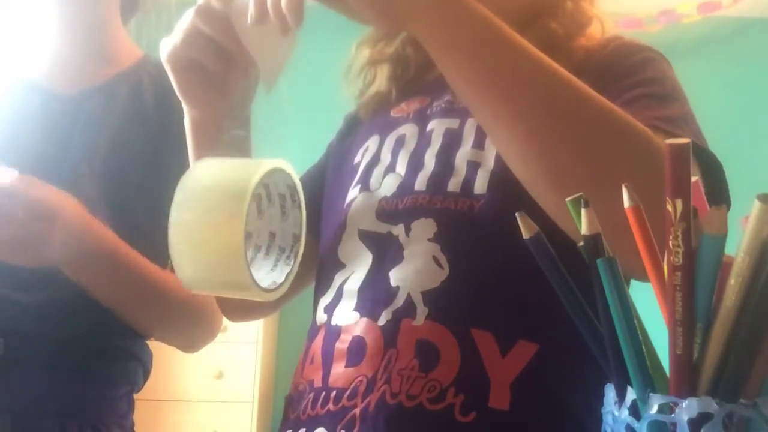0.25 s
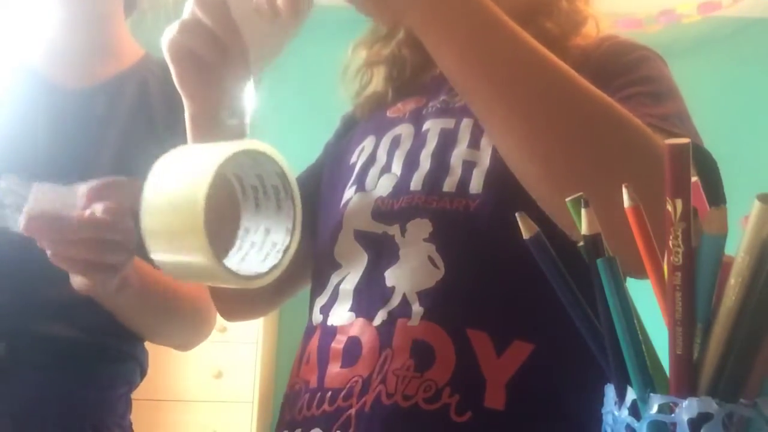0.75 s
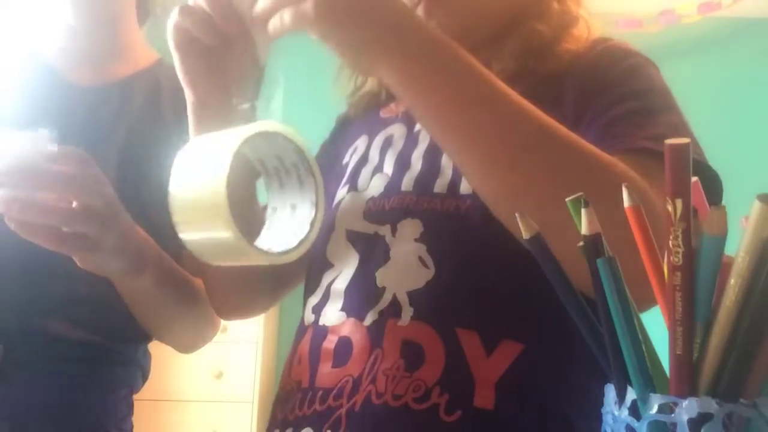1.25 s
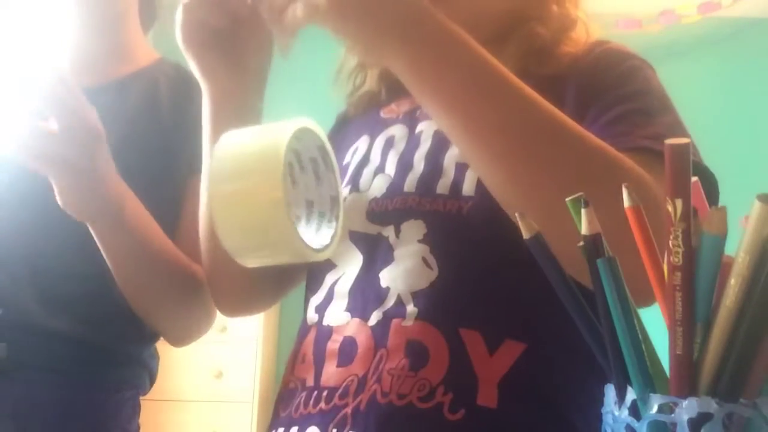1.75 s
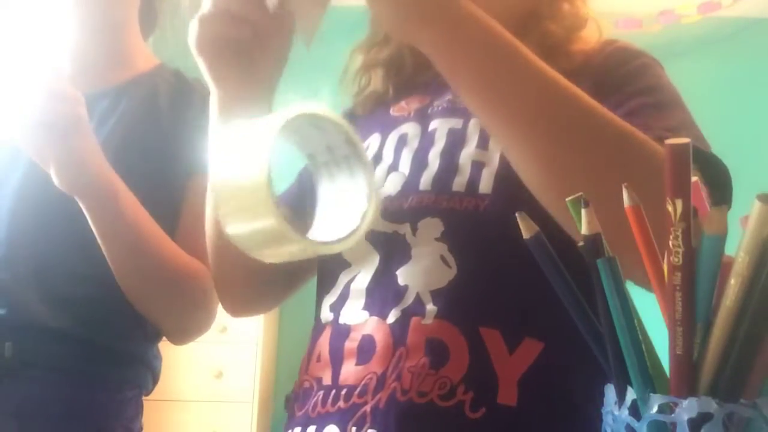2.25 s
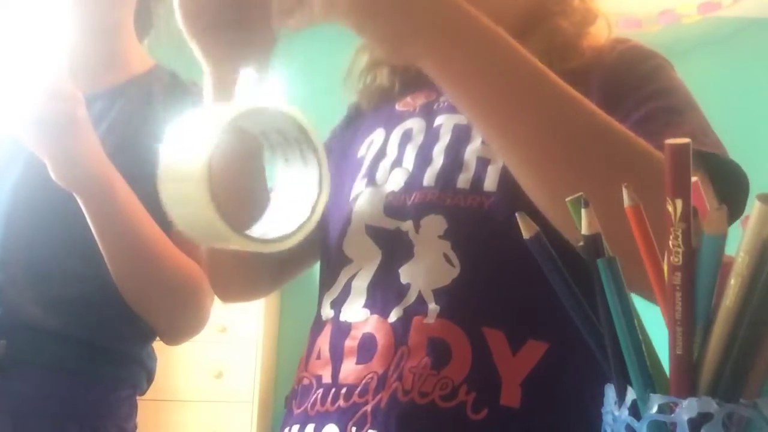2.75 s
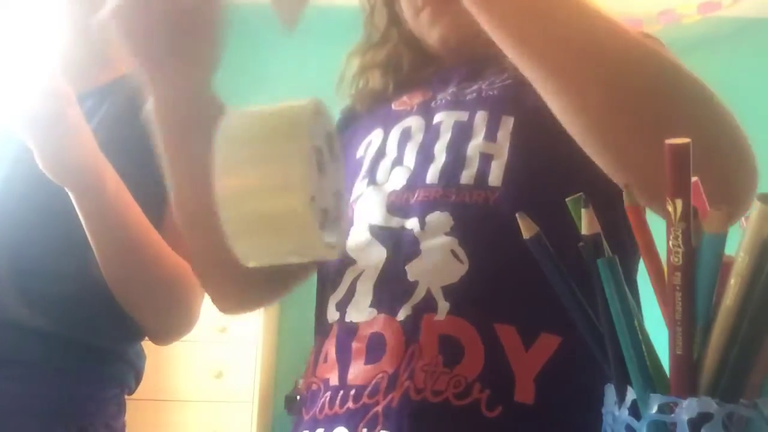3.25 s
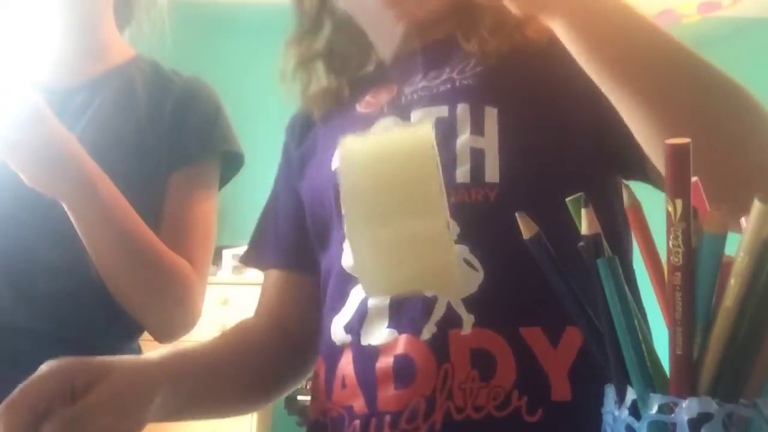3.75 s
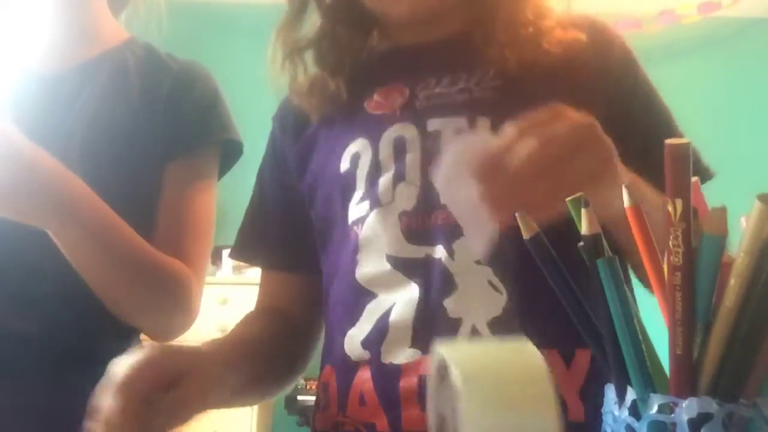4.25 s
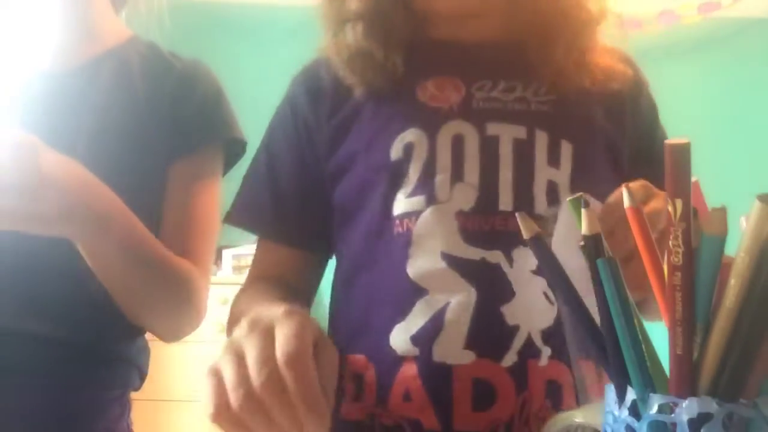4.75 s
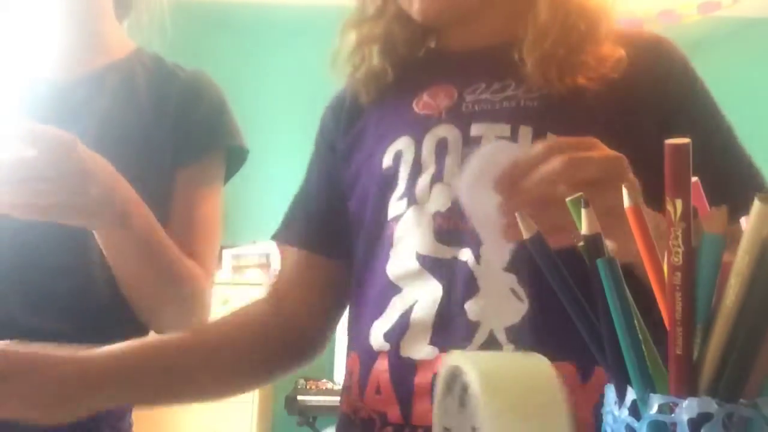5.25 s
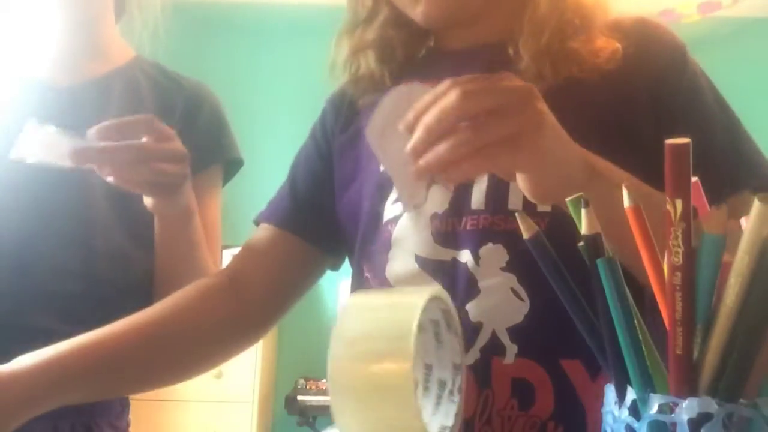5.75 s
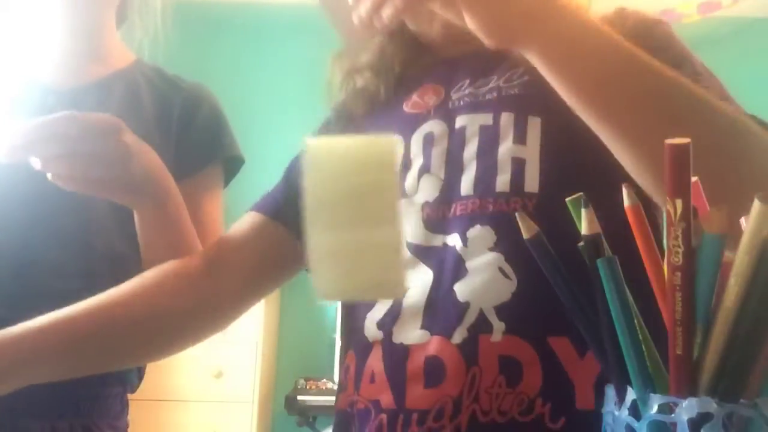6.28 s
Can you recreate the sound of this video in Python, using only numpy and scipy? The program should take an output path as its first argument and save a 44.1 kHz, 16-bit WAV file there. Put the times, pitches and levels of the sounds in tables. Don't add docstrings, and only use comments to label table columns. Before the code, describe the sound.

Loud knocks and a gritty drag on a wooden desk, then faint tape crackles and rustling, then another hard burst of knocking.

```python
import sys
import numpy as np
from scipy import signal
from scipy.fft import rfft, irfft
from scipy.io import wavfile
from scipy.ndimage import uniform_filter1d

SR = 44100
rng = np.random.default_rng(int(sys.argv[2]) if len(sys.argv) > 2 else 0)


def master_out(mix):
    frames = np.transpose(np.atleast_2d(mix))
    ceiling = np.clip(frames, -1, 1)
    pcm = np.round(ceiling * 32767).astype(np.int16)
    wavfile.write(sys.argv[1], SR, pcm)


def elevation(decibels):
    levels = np.asarray(decibels, float)
    return 10 ** (levels / 20)


N = 287532
RING = np.arange(SR // 4) / SR

# f/Hz, density/dB per Hz
HISS = [(40, -14), (86, -14), (119, -11.5), (134, -8), (155, -19), (351, -25.5), (388, -30.5), (417, -34.5),
        (684, -36), (774, -39), (1400, -41), (1620, -44), (7500, -53), (8900, -51), (13200, -52.5),
        (14600, -59)]
HISS_DB = -71.5
# f/Hz, width/Hz, level/dB
HUM = [(58.6, 6.5, -76.5), (115.8, 11, -63)]
ROOM_T60_S, ROOM_DB = 0.1, -13.5

# f/Hz, level/dB, t60/s
BOARD = [(89.6, -11.5, 0.11), (157, -2, 0.03), (195, 2.5, 0.32), (280, 4, 0.088), (320, -7, 0.17),
         (456, -8.5, 0.22)]
BOOM = [(54.6, -32, 0.13), (90.7, 4.5, 0.16), (147.1, 0, 0.14), (177.6, -5.5, 0.33)]
PANEL = [(237, -4.5, 0.029), (285.7, 1, 0.04), (331.5, -5, 0.19), (470.3, -9.5, 0.13)]
LID = [(562, -9, 0.17), (714.4, -1, 0.063), (892, -4.5, 0.033)]
CASING = [(1030, -8, .04), (1200, -4, 0.049), (1254, -1, 0.0092), (1542, -4.5, 0.011), (1810, -7.5, 0.018),
          (1630, 2, 0.0029)]
CRACK = [(2184, 0, 0.013), (2920, -12.5, 0.0047), (3380, 4, 0.0025), (3670, -6.5, 0.023), (4237, -2, 0.011),
         (4840, -1.5, 0.0034), (5890, 0.5, 0.0031), (6640, -17.5, 0.005)]
AIR = [(8670, 0, 0.0033), (11900, 4, 0.0008), (12400, -1, 0.00087), (13900, -17.5, 0.0068)]
STRIP = [(700.4, -4.5, 0.093), (1068, -3, 0.02), (1200, -5, 0.044), (1397, 3.5, 0.0074),
         (1690, -5.5, 0.021), (1890, -9, 0.01), (2230, -5, 0.0078)]
FILM = [(3000, -8.5, 0.0034), (4370, 1, 0.0025), (5000, -11.5, 0.0068), (5980, 3, 0.0059),
        (5650, -12, 0.0048)]
FLAP = [(1380, -0.5, 0.053), (1585, 0, 0.021), (1904, -5, .02), (2350, -8.5, 0.023), (2520, -19.5, 0.012)]
GRIT = [(1870, 7, 0.012), (2280, 3.5, .01), (2940, 0, 0.012), (3240, 1.5, 0.0089), (3860, -6, 0.0054),
        (4974, -11, 0.0046), (5500, -15, .006)]
PLATES = [(558, -1, 0.17), (700, 1.5, 0.13), (1230, -3, .1), (1800, -15, .07), (1980, -17.5, .06)]
PLATES_DB = -14.5

# t/s, strip peak/dB, air/dB, rattle/ms
TICKS = [(0.5107, -50, -110, 3.7), (0.6589, -60.5, -65, 13), (1.724, -56, -82, 4), (1.9844, -58, -77.5, 17),
         (2.2712, -49.5, -82, 1.7), (2.3436, -47.5, -57.5, 12), (2.4174, -53, -84, 28),
         (2.4994, -57.5, -74, 6.5), (2.5481, -63, -56.5, 7), (2.5955, -59, -50, 5.3), (2.653, -47, -74, 11),
         (2.7751, -51.5, -100, 17), (2.8823, -58, -59, 7.8), (3.025, -70, -90, 5.9),
         (3.2186, -62, -65, 7.4), (3.3064, -53, -73, 7), (3.5244, -57, -93, 3.1),
         (3.8914, -56.5, -55.5, 15.5), (3.9694, -71, -62, 20), (4.1036, -66, -66.5, 11),
         (4.2055, -58, -55, 8.6), (4.2184, -53, -41.5, 8.6), (4.3545, -52.5, -44, 6.6),
         (4.4298, -55.5, -83, 6.8), (4.6798, -57, -65.5, 26)]
# t/s, strip peak/dB, air/dB, rattle/ms
FLEXES = [(1.791, -71, -54.5, 16), (2.3247, -54, -76, 22), (2.4014, -59, -85, 24), (2.4744, -66, -73, 14),
          (3.0538, -69, -80, 21), (3.1518, -75, -79, 35), (3.225, -72, -66.5, 18), (3.404, -69.5, -67, 48),
          (3.451, -66.5, -69, 44), (3.9436, -72.5, -70, 22), (4.0044, -70, -77, 32)]
FILM_SHARE, TICK_FILM_DB, FLEX_FILM_DB = 0.49, -5, -1
# t/s, effort/dB, crispness/dB
RUSTLE = [
    [(0.45, -85, -16), (0.608, -68, -6), (0.73, -90, -24)],
    [(0.82, -70.5, 15.5), (1.32, -84, 4.5)],
    [(1.74, -63, -13), (2.1, -81, -14), (2.48, -72.5, -19.5), (2.62, -79, -16), (2.88, -67, -12.5),
     (3.1, -70.5, -6.5), (3.35, -63.5, -13.5), (3.7, -81.5, -12), (4.13, -83.5, 2.5), (4.44, -73.5, -10),
     (4.58, -65, -13), (5.08, -67.5, -17)],
]
RUSTLE_AIR_DB = -0.5
# t/s, peak/dB, rise/ms, rattle/ms
CRINKLES = [(0.755, -61, 1.7, 6), (0.822, -37, 2.3, 6.8), (4.607, -66, 3, 9), (4.655, -45.5, 3, 14),
            (4.678, -44.5, 2, 16), (4.698, -46, 1.5, 9.2), (4.72, -53, 4, 9.6), (4.75, -57.5, 6.9, 31),
            (4.825, -68, 3.1, 9.8), (4.98, -58.5, 2.9, 23), (5.32, -55, 4.1, 13), (5.40, -66, 2.5, 7.9),
            (5.425, -59, 4, 12), (5.563, -54, 3.6, 11), (5.595, -66, 4, 6)]
# t/s, peak/dB, rise/ms, rattle/ms
WISPS = [(1.158, -62, 1.4, 6), (1.19, -67, 4, 13), (1.58, -63, 2.5, 8.3), (1.8136, -62, 1.1, 6.5),
         (2.4007, -64, 2.2, 8), (2.6512, -71, 1, 3.8), (2.9335, -71, 1, 6), (3.07, -71.5, 8.7, 25),
         (3.12, -72, 8.5, 18), (3.2368, -66, 1.8, 15), (3.43, -73, 9.7, 30), (3.9777, -61.5, 1.12, 5.3),
         (4.0141, -66, 3, 18), (4.0964, -73.5, 2.1, 8.7), (4.1153, -65.5, 1.1, 7), (4.262, -69.5, 2, 6),
         (5.475, -64.5, 5.3, 13), (5.68, -59, .8, 7)]

# t/s, pressure/dB, bite/dB
DRAGS = [
    [(0.76, -47.5, -14), (0.83, -59, -1), (0.944, -44, -13), (1.03, -41.5, -7.5), (1.144, -37, -13),
     (1.284, -44.5, -19.5), (1.464, -38, -21), (1.56, -58, -7), (1.74, -63, -7.5)],
    [(5.1, -73, -4), (5.17, -53, -9), (5.3, -65.5, -4), (5.445, -58, -3), (5.49, -55, -6),
     (5.632, -47, -12)],
    [(5.665, -35, -20), (5.819, -48, -14), (5.941, -42.5, -19), (6.049, -48, -18), (6.22, -41, -31),
     (6.29, -40, -8.5), (6.36, -44.5, -15), (6.44, -59.5, -0.5), (6.52, -51, -14)],
]
DRAG_LID_DB, DRAG_CRACK_DB = -16, -13
# t/s, peak/dB, rise/ms, rattle/ms
SCRAPES = [(0.89, -55, 5, 8.8), (1.03, -52, 5.7, 16), (1.121, -59, 4, 10), (1.14, -45, 4.5, 11),
           (1.158, -40.5, 6, 25), (1.195, -52, 6, 14), (1.232, -52, 1.8, 5.4), (1.505, -47, 8.6, 12),
           (1.56, -55.5, 5, 8.8), (5.11, -47, 2.9, 20), (5.475, -42.5, 8, 16), (5.58, -65, 5, 10),
           (5.66, -44, 4.1, 9.6), (6.028, -59, 5, 18), (6.108, -49, 7, 13), (6.35, -63, 2.2, 5.4)]
# landing t/s, level/dB
GRAZES = [
    (5.089, -37),
    (5.46, -36),
    (5.644, -39),
    (5.881, -52),
    (6.197, -40),
    (6.424, -41),
]

# t/s, peak/dB, f/Hz, rattle/ms
CLIPS = [
    (0.8772, -32, 3435, 3),
    (1.0001, -25.5, 3840, 3),
    (1.1948, -46, 3000, 11),
    (5.0868, -34, 2970, 5.3),
    (5.641, -39, 3340, 9.2),
    (6.2462, -30.5, 3710, 2.8),
    (6.2851, -46, 3380, 3.6),
]
# t/s, peak/dB, f/Hz, rattle/ms
KEYS = [(0.8464, -30, 1200, 1.6), (1.0151, -16.5, 1115, 2.3), (1.065, -41.5, 1130, 12),
        (1.1709, -34.5, 1150, 7.8), (1.226, -35.5, 1090, 3.6), (1.5391, -48, 1590, 4.8),
        (2.7738, -48.5, 1360, 3.4), (5.3658, -51, 1290, 24), (5.4026, -44.5, 1340, 21),
        (5.8819, -48, 1200, 14), (6.1984, -27.5, 1600, 8.5)]
# t/s, peak/dB, f/Hz,
# rattle/ms
PINS = [(1.3275, -79, 8700, 3), (1.456, -49.5, 12400, 12), (1.46, -55, 9200, 8), (2.272, -59.5, 3430, 7.5),
        (2.343, -53.5, 4540, 12), (2.41, -62, 4630, 20), (3.155, -69.5, 4150, 61), (3.22, -67, 4140, 23),
        (5.3304, -63, 4800, 19), (6.1144, -63, 5850, 10), (6.4225, -30.5, 5270, 6.3),
        (6.4457, -53.5, 5060, 31)]
# t/s, peak/dB, f/Hz, rattle/ms
CHATTER = [(0.93, -36, 291, 19), (0.955, -42, 700, 14), (1.003, -20, 281, 2.8), (1.07, -41, 1230, 15),
           (1.1, -37.5, 543, 13), (1.185, -36, 1230, 15), (1.24, -44, 689, 18), (1.41, -46, 700, 29),
           (1.484, -30, 293, 6.7), (1.502, -23, 296, 9), (1.519, -44, 2330, 3.1), (1.96, -56.5, 294, 44),
           (4.535, -59.5, 280, 7.4), (4.665, -50, 263, 15), (4.712, -49, 204, 8.9), (5.222, -61, 707, 9),
           (5.46, -31, 562, 14), (5.887, -33, 562, 9.1), (6.255, -35, 352, 5.2), (6.425, -24, 327, 7)]
# t/s, peak/dB, f/Hz, t60/s
SOLID = [(0.778, -32, 284, .08), (0.789, -28.5, 280, 0.043), (0.847, -31, 274, 0.11),
         (0.879, -33, 154, .16), (0.885, -39, 102, .16), (0.889, -30.5, 266, 0.19),
         (1.01, -22.5, 148.3, .16), (1.35, -31, 238, 0.098), (1.39, -35.5, 88, 0.18),
         (1.535, -26, 288, 0.085), (1.55, -28, 151, 0.11), (5.09, -32.5, 339, 0.046),
         (5.105, -30, 97.6, 0.16), (5.458, -24, 728, 0.065), (5.459, -24, 336, 0.1),
         (5.465, -29, 120, 0.13), (5.646, -24, 322, 0.059), (5.649, -29, 840, 0.035),
         (5.655, -24.5, 89, 0.23), (5.758, -31.5, 129, 0.19), (5.769, -23.5, 262, 0.023),
         (6.197, -31, 339, 0.14), (6.202, -31.5, 144, 0.085), (6.221, -30.5, 126, 0.36),
         (6.253, -32.5, 349.5, 0.16), (6.43, -32, 96, 0.086), (5.462, -31.5, 560, 0.15),
         (5.884, -35, 340, 0.057), (5.887, -38, 562, 0.11), (6.425, -24.5, 310, 0.034),
         (1.483, -29.5, 286, .18),
         (1.013, -27, 715, 0.046), (1.539, -27.5, 985, 0.023), (1.539, -25.5, 1507, 0.018),
         (3.307, -64.5, 655, 0.055), (5.087, -42, 3135, 0.044), (5.456, -36, 2180, 0.037),
         (5.458, -35.5, 3110, .025), (5.643, -32, 6000, .015), (5.644, -41, 3260, .025),
         (5.712, -35.5, 1365, .04), (5.738, -32, 1400, 0.059), (5.737, -29, 2263, 0.026),
         (5.751, -27.5, 1577, 0.038), (6.202, -28, 2155, .025), (6.246, -35, 3310, 0.028)]
SOLID_RISE_S = 0.0016

# t/s, strength/dB, push/ms
TAPS = [(0.777, -32.5, 16), (0.92, -33.5, 23), (1.016, -28, 2.7), (1.17, -38, 8.4), (1.226, -34, 4),
        (1.332, -40, 6.7), (1.351, -38.5, 9.8), (1.416, -37, 11), (5.458, -27, 2.5), (5.799, -34, 5.5),
        (6.29, -38.5, 5.3)]
# t/s, strength/dB, push/ms
THUMPS = [(0.846, -32, 16), (0.88, -27.5, 7), (1.005, -31, 10), (1.39, -35, 3.4), (1.536, -33, 4),
          (2.343, -50, 3.5), (5.089, -30.5, 3.9), (5.489, -36, 2.8), (5.644, -31, 9.8), (5.714, -32, 22),
          (5.76, -31.5, 9.5), (6.201, -28, 5.1), (6.247, -30, 13), (6.426, -35, 3.5)]
# t/s, strength/dB, push/ms
THUDS = [
    (0.982, -41.5, 1.7),
    (1.057, -51, 15),
    (1.564, -41.5, 7.5),
    (5.111, -40.5, 7.4),
    (5.322, -55.5, 25),
    (5.885, -44.5, 12),
    (5.953, -50, 4.2),
    (6.113, -41.5, 1),
    (6.224, -41.5, 9.2),
    (6.347, -39, 14),
]
TAP_BOOM_DB, THUMP_BOOM_DB, THUD_BOOM_DB = -12, -1.5, 6

# t/s, crack peak/dB, lid/dB, casing/dB, rattle/ms
SCUFFS = [(0.7806, -54.5, -43, -60, 7.5), (1.1937, -58, -52, -62, 45), (1.3944, -65, -52, -70, 18),
          (1.4824, -70, -37, -38.5, 58), (1.5115, -57, -41, -31, 10), (1.6204, -70.5, -77.5, -66.5, 41),
          (5.1244, -57.5, -58.5, -53, 26.3), (5.2275, -66, -52.5, -51, 4.4), (5.3457, -73, -60, -60, 9.9),
          (5.385, -86, -53.5, -53.5, 110), (5.4944, -60, -45, -42, 5.5), (5.5843, -67, -61, -43, 4.3),
          (5.82, -50.5, -74, -44.5, 6.8), (6.022, -62, -46.5, -54, 40), (6.1085, -57, -49, -44.5, 5.3),
          (6.1304, -53, -65, -44.5, 2.2), (6.352, -58, -41.5, -42, 3.2)]
BUMPS = [
    (0.878, -34.5, -29, -29, 9.6),
    (1.2274, -55, -56, -42, 3.3),
    (1.3271, -36, -34.5, -29.5, 7.1),
    (5.0878, -29, -29.5, -34.5, 6.1),
    (5.455, -25, -23, -29.5, 5),
    (5.7372, -23, -26, -24, 8.3),
    (5.8818, -33, -31, -25.5, 4.2),
    (6.2456, -25, -27, -26, 6.5),
]
KNOCKS = [(0.8463, -35, -40, -44, 14), (1.0001, -25.5, -56, -24, 9.3), (1.0104, -23, -24.5, -28, 2.7),
          (1.1721, -53, -41, -62, 20), (1.3764, -54, -44, -44.5, 16), (1.456, -41, -44, -39.5, 19),
          (1.5339, -28, -42, -21.5, 6.4), (5.195, -49, -65, -46, 3.1), (5.246, -57, -79, -52, 4.1),
          (5.3235, -59.5, -60, -49.5, 14), (5.6417, -21.5, -29.5, -37, 12.2), (5.7498, -20.5, -36, -26, 8),
          (6.1976, -20, -29.5, -29, 7.8), (6.2862, -54, -37, -31.5, 2.2)]
SNAPS = [
    (0.7334, -44.5, -74, -57.5, 7),
    (0.8255, -32.5, -61, -34, 8.9),
    (1.0161, -39, -32.5, -32.5, 2.5),
    (1.5375, -43, -33.5, -32, 3.7),
    (5.7123, -56, -28.5, -37.5, 10),
    (5.9482, -67, -45, -45, 5.7),
    (6.4238, -30.5, -28, -30, 4.2),
]
SNAP_AIR_DB, KNOCK_AIR_DB, BUMP_AIR_DB, SCUFF_AIR_DB = -12, -23, -29, -23

CONTACT_REACH, CONTACT_FLOOR = 2.26, 0.58
TAIL_DB, TAIL_STRETCH = -27.5, 2.5
DIP_HZ, DIP_WIDTH_HZ, DIP_SHARE, SOFT_TOP_HZ = 7140, 770, 0.73, 15000


def unit(x):
    return x / np.sqrt(np.mean(x ** 2))


def add(track, x, s):
    i = int(s * SR)
    track[i:i + len(x)] += x[:N - i]


def in_order(*kinds):
    return sorted((*row, setting) for rows, setting in kinds for row in rows)


def decay(t60):
    return np.exp(-np.log(1000) * RING / t60)


def grains(size, spread_db):
    return unit(rng.standard_normal(size) * elevation(spread_db * rng.exponential(size=size)))


def body(modes, scatter_db, detune):
    hz, db, t60 = np.transpose(modes)[:, :, None]
    pitch_luck, level_luck, side = rng.standard_normal((3, len(modes), 1))
    pitch = hz * (1 + detune * np.clip(hz / 1000, 2, 4) * pitch_luck)
    wave = np.sin(2 * np.pi * pitch * RING) * np.sign(side)
    level = elevation(db + scatter_db * level_luck) / np.sqrt(t60)
    return (level * decay(np.maximum(t60, 1e-3)) * wave).sum(axis=0)


def strike(modes, length_s, rise_s, db):
    spot = body(modes, scatter_db=2, detune=.006)
    rise = (1 - np.exp(-RING / rise_s)) ** 2
    shiver = elevation(TAIL_DB) * np.exp(-RING / length_s / TAIL_STRETCH)
    rattle = rise * (np.exp(-RING / length_s) + shiver) * grains(len(RING), spread_db=2.5)
    sound = signal.fftconvolve(rattle, spot)[:len(RING)]
    reach_hz = min(CONTACT_REACH * max(modes)[0], .45 * SR)
    floor_hz = CONTACT_FLOOR * min(modes)[0]
    sound = signal.sosfilt(signal.butter(2, reach_hz, fs=SR, output="sos"), sound)
    sound = signal.sosfilt(signal.butter(2, floor_hz, "high", fs=SR, output="sos"), sound)
    return elevation(db) * sound / np.sqrt(uniform_filter1d(sound ** 2, size=400).max())


def seconds(ms):
    return max(ms, 1) / 1000


def walk(rate):
    k = int(SR / rate)
    held = np.repeat(rng.standard_normal(N // k + 1), k)
    return uniform_filter1d(held, k)[:N]


def rub(tables, bodies, trim_db, catch_db, patchy_db, spread_db):
    out, t = np.zeros(N), np.arange(N) / SR
    catch = elevation(catch_db * walk(45))
    for k, modes in enumerate(bodies):
        gain = np.zeros(N)
        for rows in tables:
            columns = np.transpose(rows)
            gain += elevation(np.interp(t, columns[0], columns[k + 1], -150, -150))
        friction = catch * elevation(patchy_db * walk(14)) * grains(N, spread_db)
        ringing = signal.fftconvolve(friction, body(modes, scatter_db=0, detune=0))[:N]
        out += elevation(trim_db) * uniform_filter1d(gain, size=500) * unit(ringing)
    return out


def flurries(rows, modes):
    out = np.zeros(N)
    for s, db, rise_ms, ms in rows:
        add(out, strike(modes, seconds(ms), max(rise_ms, .2) / 1000, db - 9.5), s)
    return out


def room_tone():
    hz = np.fft.rfftfreq(N, 1 / SR) + 1
    knot_hz, knot_db = np.transpose(HISS)
    colour = elevation(np.interp(np.log(hz), np.log(knot_hz), knot_db, right=-120))
    above_hum = np.sum(colour[hz > 200] ** 2) / np.sum(colour ** 2)
    hiss = unit(irfft(rfft(rng.standard_normal(N)) * colour, N))
    out = elevation(HISS_DB) * hiss / np.sqrt(above_hum)
    for centre_hz, width_hz, db in HUM:
        spread = 1 + ((hz - centre_hz) / width_hz * 2) ** 2
        out += elevation(db) * unit(irfft(rfft(rng.standard_normal(N)) / spread, N))
    return out


def room_tail(near):
    tail = rng.standard_normal(len(RING)) * decay(ROOM_T60_S) * (RING > .004)
    tail = signal.lfilter([1], [1, -.5], tail)
    wet = signal.fftconvolve(near, tail / np.sqrt(np.sum(tail ** 2)))[:N]
    return elevation(ROOM_DB) * wet


def rustle():
    levels = [[(s, db, db + crisp, db + crisp + RUSTLE_AIR_DB) for s, db, crisp in rows] for rows in RUSTLE]
    return rub(levels, [STRIP, FILM, AIR], trim_db=-7.0, catch_db=8.5, patchy_db=-2.0, spread_db=2.5)


def ticks(rows, rise_s, trim_db):
    out = np.zeros(N)
    for s, strip_db, air_db, ms in rows:
        length = seconds(ms)
        film_db = strip_db + FILM_SHARE * (air_db - strip_db) + trim_db
        hit = strike(STRIP, length, rise_s, strip_db - 8.0)
        hit += strike(FILM, 0.95 * length, rise_s, film_db - 4.0)
        hit += strike(AIR, 0.95 * length, rise_s, air_db - 11.0)
        add(out, hit, s)
    return out


def loose(rows, t60):
    out = np.zeros(N)
    for s, db, hz, ms in rows:
        add(out, strike([(hz, 0, t60)], seconds(ms), 0.0021, db - 8.0), s)
    return out


def plates():
    levels = [[(s, db + PLATES_DB) for s, db, bite in rows] for rows in DRAGS]
    return rub(levels, [PLATES], trim_db=0.0, catch_db=4.0, patchy_db=2.5, spread_db=2)


def grazes(swell_s, low_db):
    out, grow = np.zeros(N), np.exp(-RING[::-1] / swell_s)
    for s, db in GRAZES:
        push = grow * grains(len(RING), spread_db=-6.5)
        scrape = 0
        for modes, level_db in ((CRACK, 0), (LID + CASING, low_db)):
            part = signal.fftconvolve(push, body(modes, scatter_db=0, detune=0))[:len(RING) + 200]
            scrape = scrape + elevation(level_db) * part / np.abs(part).max()
        add(out, elevation(db) * scrape, s - len(RING) / SR)
    return out


def drags():
    levels = [[(s, db, db + DRAG_LID_DB, db + bite, db + bite + DRAG_CRACK_DB) for s, db, bite in rows]
              for rows in DRAGS]
    return rub(levels, [BOARD, LID, CASING, CRACK], trim_db=-7.0, catch_db=-1.5, patchy_db=1.5, spread_db=2.5)


def solid():
    out = np.zeros(N)
    for s, db, hz, t60 in SOLID:
        fade = (1 - np.exp(-RING / min(SOLID_RISE_S, 2 / hz))) * decay(t60)
        add(out, elevation(db) * fade / fade.max() * np.sin(2 * np.pi * hz * RING), s)
    return out


def thumps():
    out = np.zeros(N)
    for s, db, ms, boom_db in in_order((TAPS, TAP_BOOM_DB), (THUMPS, THUMP_BOOM_DB), (THUDS, THUD_BOOM_DB)):
        hit = strike(PANEL, seconds(ms), 0.0042, db - 4)
        hit += strike(BOOM, seconds(ms), 0.011, db + boom_db - 2.5)
        add(out, hit, s)
    return out


def blows(kinds, rise_s):
    out = np.zeros(N)
    for s, crack_db, lid_db, casing_db, ms, air_db in in_order(*kinds):
        length = seconds(ms)
        hit = strike(LID, length, rise_s + 0.0018, lid_db - 6.0)
        hit += strike(CASING, length, rise_s + 0.0038, casing_db - 9.5)
        hit += strike(CRACK, 1.01 * length, rise_s, crack_db - 14.5)
        hit += strike(AIR, 0.36 * length, rise_s, crack_db + air_db - 5.5)
        add(out, hit, s)
    return out


def knocks():
    sharp = blows([(SNAPS, SNAP_AIR_DB), (KNOCKS, KNOCK_AIR_DB), (BUMPS, BUMP_AIR_DB)], rise_s=0.00067)
    return sharp + blows([(SCUFFS, SCUFF_AIR_DB)], rise_s=0.0028)


def shaded(near):
    dip = signal.lfilter(*signal.iirpeak(DIP_HZ, DIP_HZ / DIP_WIDTH_HZ, fs=SR), near)
    return signal.sosfilt(signal.butter(6, SOFT_TOP_HZ, fs=SR, output="sos"), near - DIP_SHARE * dip)


def scene():
    near = knocks() + loose(CLIPS, t60=0.017) + loose(KEYS, t60=0.016)
    near += ticks(TICKS, rise_s=0.00008, trim_db=TICK_FILM_DB)
    near += ticks(FLEXES, rise_s=0.01, trim_db=FLEX_FILM_DB)
    near += thumps() + solid() + drags() + rustle()
    near += flurries(CRINKLES, FLAP) + flurries(SCRAPES, GRIT) + flurries(WISPS, AIR)
    near += loose(CHATTER, t60=0.15)
    near = shaded(near)
    mix = near + room_tail(near) + room_tone()
    mix += grazes(swell_s=0.0038, low_db=-2.0) + loose(PINS, t60=0.0024) + plates()
    return mix[None]


def band_limit(x):
    return signal.sosfilt(signal.butter(12, 16470, fs=SR, output="sos"), x)


def record(dry):
    x = signal.sosfilt(signal.butter(6, 50, "high", fs=SR, output="sos"), dry)
    x = signal.sosfilt(signal.ellip(6, .2, 60, 15500, fs=SR, output="sos"), x)
    x = .3 * np.tanh(x / .3)
    return band_limit(x)


dry = scene()
out = record(dry)
master_out(out)
```